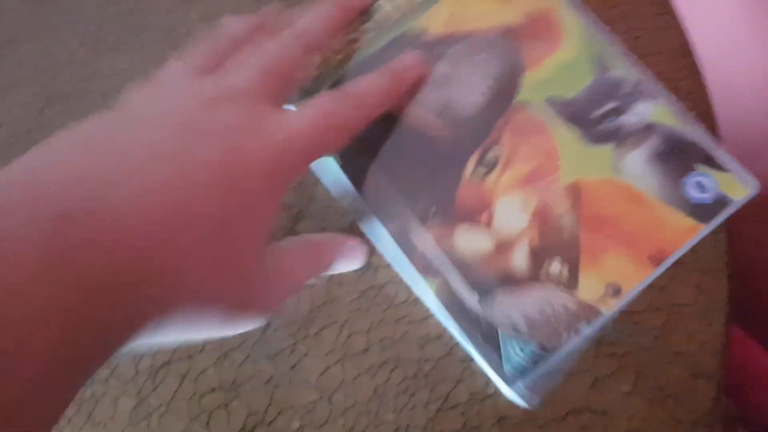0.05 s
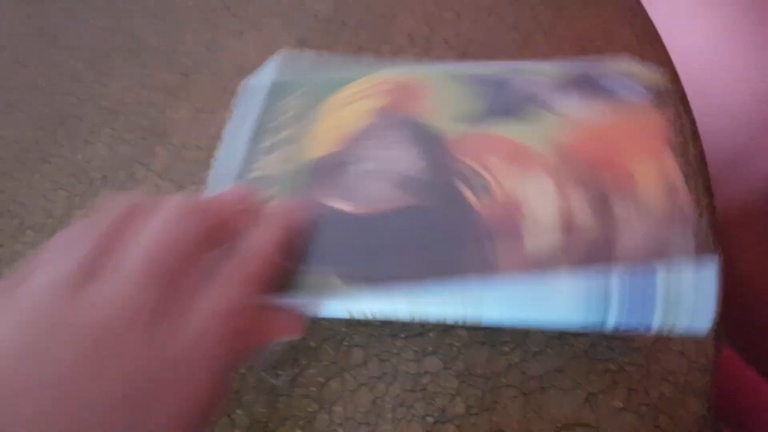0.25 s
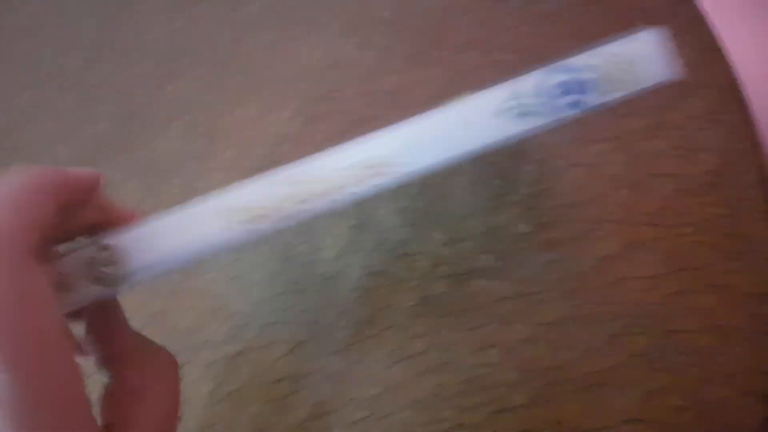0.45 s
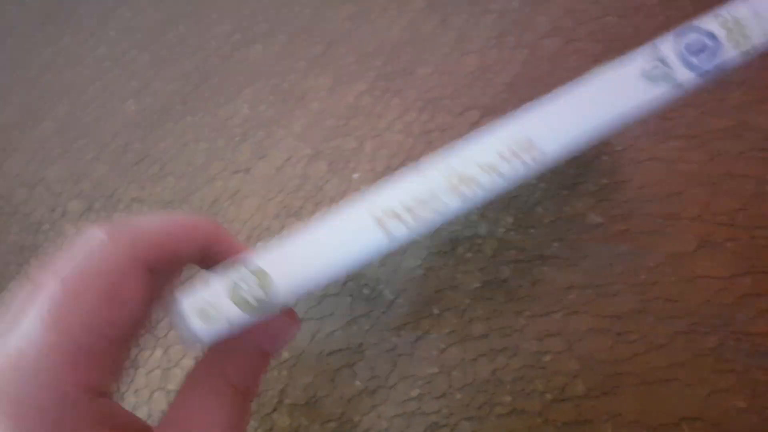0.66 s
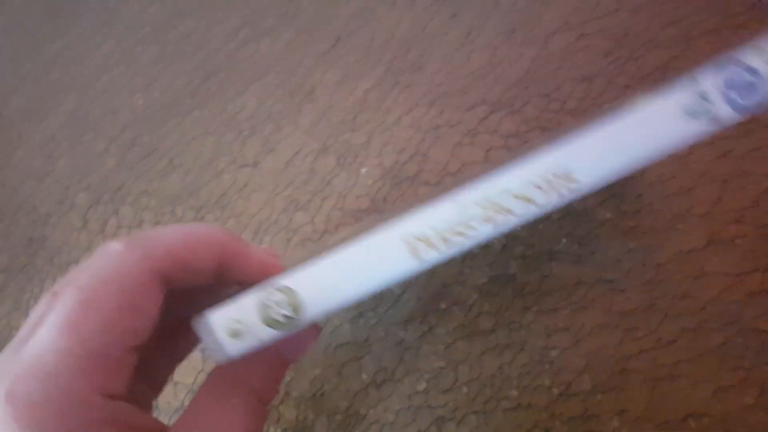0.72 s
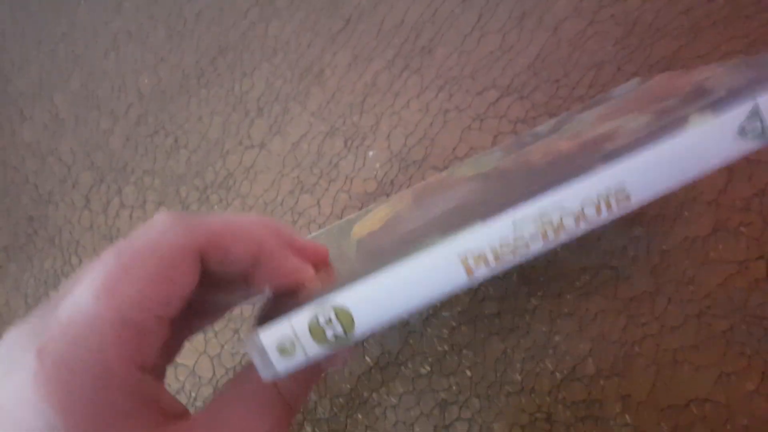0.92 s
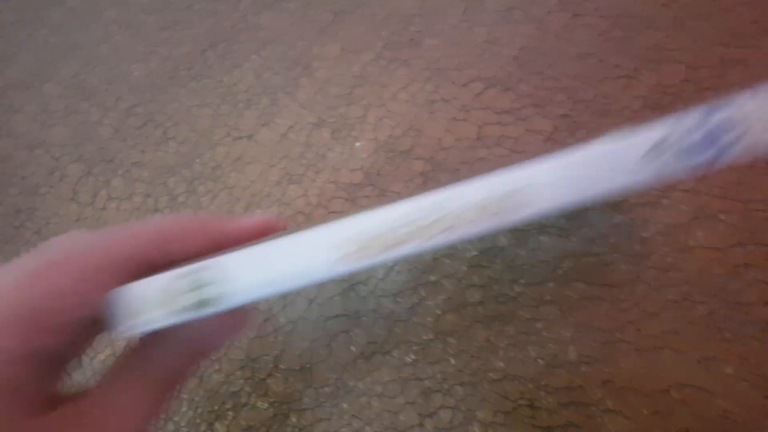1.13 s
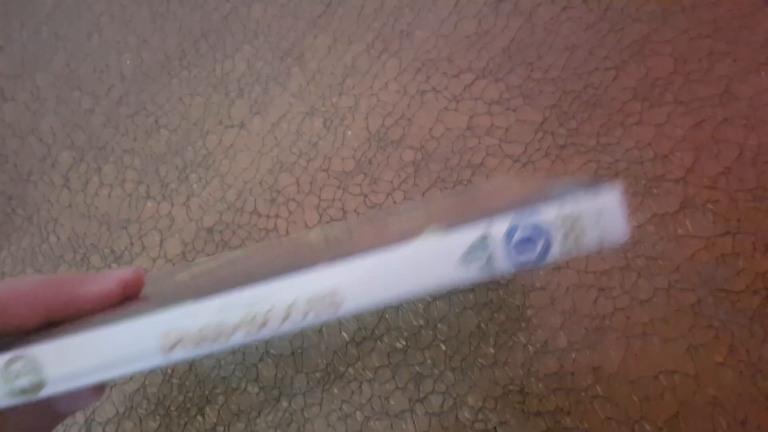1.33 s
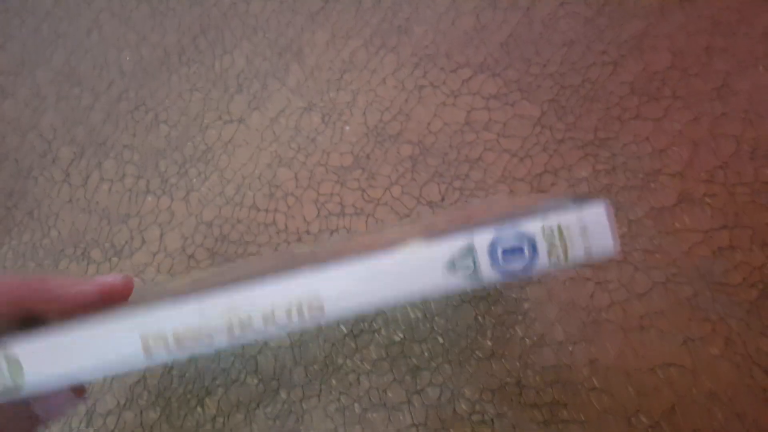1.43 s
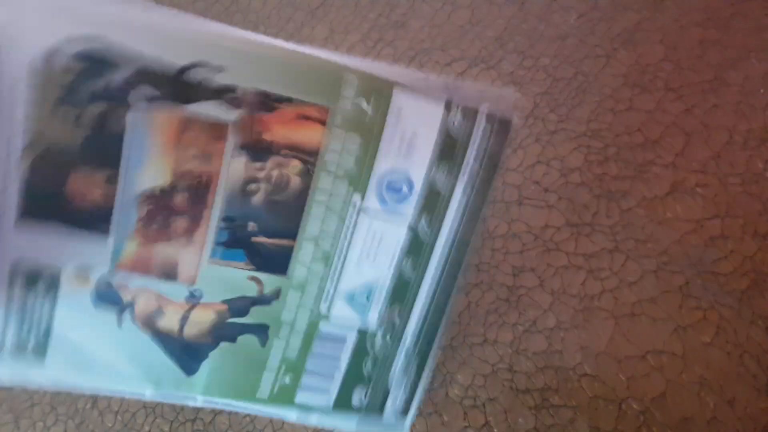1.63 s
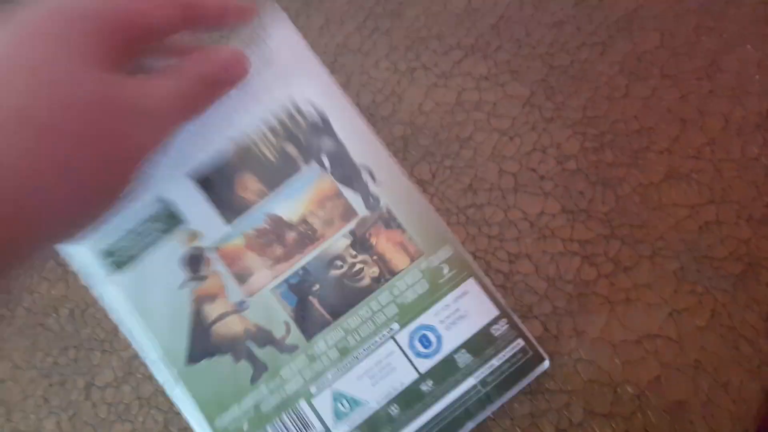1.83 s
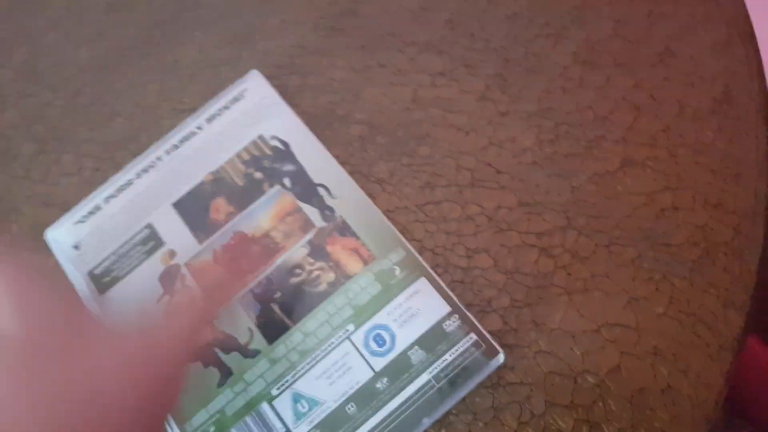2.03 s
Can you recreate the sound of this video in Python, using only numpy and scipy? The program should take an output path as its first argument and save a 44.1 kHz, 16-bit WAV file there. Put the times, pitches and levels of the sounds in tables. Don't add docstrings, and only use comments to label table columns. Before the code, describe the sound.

Close, slightly roomy stereo sound of a thin plastic case: soft touch and clicks, a loud cracking knock and lower thud, a quieter stretch of faint creaks, then a sharp click and hard landing.

```python
import sys
import numpy as np
from scipy import signal
from scipy.fft import rfft, irfft, next_fast_len
from scipy.io import wavfile
from scipy.ndimage import uniform_filter1d, map_coordinates

SR = 44100
rng = np.random.default_rng(int(sys.argv[2]) if len(sys.argv) > 2 else 0)


def put_to_file(sound):
    columns = np.atleast_2d(sound).T
    safe = np.clip(columns, -1, 1)
    whole_steps = np.round(safe * 32767)
    wavfile.write(sys.argv[1], SR, whole_steps.astype(np.int16))


def convert_level_to_amplitude(level_db):
    exponent = np.asarray(level_db, float) / 20
    return 10 ** exponent


N = 91331

# pitch_hz, bandwidth_hz, level_db
SHELL_MODES = [(565, 250, 0.5), (770, 81, -17), (900, 194, 2.5), (1125, 20, -2), (1420, 490, 1.5),
               (2070, 250, -17), (2500, 27, 1), (3380, 40, -4), (4370, 490, -11.5)]
# pitch_hz, bandwidth_hz, level_db
TABLE_MODES = [(146, 65, -8), (271, 38, 0.5), (314, 57, -3), (405, 84, -3.5)]


def unit(x):
    return x / np.sqrt(np.mean(x ** 2) + 1e-20)


def peak_unit(x):
    return x / np.abs(x).max()


def along(points, hz):
    f, v = np.transpose(points)
    return np.interp(np.log(hz + 1), np.log(f + 1), v)


def wobble(rate):
    knots = rng.standard_normal(int(N * rate / SR) + 4)
    return map_coordinates(knots, [np.arange(N) * rate / SR])


def filtered(x, response):
    n = x.shape[-1]
    m = next_fast_len(2 * n)
    return irfft(rfft(x, m) * response(np.fft.rfftfreq(m, 1 / SR)), m)[..., :n]


def coloured(x, points):
    return filtered(x, lambda hz: convert_level_to_amplitude(along(points, hz)) * (hz >= points[0][0]))


def modes(peaks, f):
    total = 0
    for k, (centre, width, db) in enumerate(peaks):
        resonance = 1j * f * width / (centre * centre - f * f + 1j * f * width)
        total = total + (-1) ** k * convert_level_to_amplitude(db) * resonance
    return total


def even(x, bins):
    z = rfft(x)
    return irfft(z / np.sqrt(uniform_filter1d(np.abs(z) ** 2, bins) + 1e-9), len(x))


def pair(x):
    # hz, coherence
    coherence = [(60, 0.8), (300, 0.91), (700, 0.76), (1400, 0), (3000, 0)]

    def mix(hz):
        angle = np.arccos(np.clip(along(coherence, hz), 0, 1)) / 2
        return np.array([np.cos(angle), np.sin(angle)])

    mid, side = filtered(x, mix)
    return np.array([mid + side, mid - side])


def background():
    # hz, level_db
    tone_spectrum = [(25, -7.5), (120, -10), (230, -5.5), (450, -17.5), (2000, -18.5), (5400, -35.5),
                     (9000, -42.5), (16000, -38)]
    # hz, level_db
    rumble_spectrum = [(20, -35), (45, 7.5), (80, 3.5), (130, -49.5)]
    # time_s, over_rumble_db
    bumps = [
        (.05, 28),
        (.25, 17.5),
        (.55, 6),
        (.87, -2),
        (1.37, 14),
        (1.79, 5),
        (1.88, 19),
    ]
    bump_s, swing_db = 0.075, 5.5
    tone = unit(coloured(pair(rng.standard_normal((2, N))), tone_spectrum))
    t = np.arange(N) / SR
    jolts = sum(db * np.exp(-((t - s) / bump_s) ** 2) for s, db in bumps)
    rumble = unit(coloured(pair(rng.standard_normal((2, N))), rumble_spectrum))
    rumble = rumble * convert_level_to_amplitude(swing_db * wobble(7.6) + jolts)
    return convert_level_to_amplitude(-56) * tone + convert_level_to_amplitude(-75) * rumble


def room(x):
    # hz, t60_s
    decay = [(150, 0.27), (400, 0.42), (1000, 0.32), (2800, 0.54), (7000, 0.28), (15000, 0.42)]
    # hz, level_db
    tail_spectrum = [(100, 2), (500, 5.5), (2000, 5.5), (6000, 4), (15000, -2)]
    delay_s = 0.004
    hz, t, z = signal.stft(rng.standard_normal((2, SR)), SR, nperseg=256)
    level_db = along(tail_spectrum, hz)[:, None] - 60 * t / along(decay, hz)[:, None]
    tail = pair(signal.istft(z * convert_level_to_amplitude(level_db), SR, nperseg=256)[1])
    late = np.pad(x, (round(delay_s * SR), 0))[None]
    return signal.fftconvolve(late, tail / np.linalg.norm(tail[0]), axes=1)[:, :N]


def slides():
    # start_s, length_s, level_db, centre_hz
    strokes = [
        (0.097, 0.11, -45.5, 13200),
        (0.11, 0.078, -52.5, 5300),
        (0.167, 0.1, -49.5, 11500),
        (0.246, 0.18, -50, 6900),
        (1.096, 0.1, -59.5, 5030),
        (1.167, 0.2, -56, 4900),
        (1.18, 0.15, -62, 12000),
        (1.513, 0.1, -64, 5600),
        (1.66, 0.027, -62, 11900),
        (1.707, 0.036, -59.5, 12500),
    ]
    t = np.arange(N) / SR
    out = np.zeros((2, N))
    for s, long, db, hz in strokes:
        band = [(hz, hz, 0)]
        hiss = unit(filtered(rng.standard_normal((2, N)), lambda f: modes(band, f) ** 2))
        stroke = np.sin(np.pi * np.clip((t - s) / long, 0, 1) ** 0.72)
        out += convert_level_to_amplitude(db) * stroke * hiss * convert_level_to_amplitude(2.4 * wobble(110))
    return out


def creak(gain, ring_db, lump_db):
    # pitch_hz, bandwidth_hz, level_db
    squeezed_modes = [(322, 14.8, 12.5), (900, 61, 1), (1613, 490, -1), (2500, 280, 11.5), (3080, 900, 5),
                      (4340, 320, 8.5), (5080, 1200, -3.5)]
    # hz, level_db
    creak_spectrum = [(150, 2), (350, -6), (900, 3.5), (1700, -5), (3000, -17), (5200, -11.5), (7000, -24),
                      (16000, -23)]
    slips_a_s, spread_db = 1700, 1.5
    size = np.minimum(spread_db * rng.exponential(size=N), 9)
    slips = (rng.random(N) < slips_a_s / SR) * rng.standard_normal((2, N)) * convert_level_to_amplitude(size)
    rub = pair(unit(slips) + 0.77 * rng.standard_normal((2, N)))
    rung = filtered(rub, lambda f: 1 + convert_level_to_amplitude(ring_db) * modes(squeezed_modes, f))
    return unit(coloured(rung, creak_spectrum)) * gain * convert_level_to_amplitude(lump_db * wobble(70))


def handling():
    # time_s, level_db
    grip_level = [(0, -35.5), (.1, -45.5), (.3, -46), (.4, -41.5), (.44, -41), (0.519, -45.5), (0.699, -42),
                  (1.054, -77), (1.1, -54), (1.28, -48.5), (1.3, -65.5), (1.44, -55.5), (1.56, -51),
                  (1.6, -66), (1.72, -57.5), (1.85, -40.5), (1.92, -43)]
    # start_s, length_s, level_db
    squeezes = [
        (1.079, 0.1, -51),
        (1.17, 0.11, -44.5),
    ]
    t = np.arange(N) / SR
    grip = creak(convert_level_to_amplitude(np.interp(t, *np.transpose(grip_level))), ring_db=3.5, lump_db=3.0)
    press = np.zeros(N)
    for s, long, db in squeezes:
        press += convert_level_to_amplitude(db) * np.abs(np.sin(np.pi * np.clip((t - s) / long, 0, 1))) ** 1.07
    return grip + creak(press, ring_db=12, lump_db=3.5)


def panels():
    # start_s, level_db, pitch_hz, t60_ms
    panel_modes = [(.032, -25, 657, 62), (.034, -32, 193.4, 126), (.14, -29.5, 1910, 20),
                   (0.142, -28.5, 2530, 7.8), (0.197, -30, 1376, 35), (0.197, -33, 4200, 34),
                   (.198, -32.5, 2610, 20), (.367, -35, 871, 47), (.476, -21, 1110, 28),
                   (.476, -20, 1400, 32), (.476, -25, 2300, 30), (0.474, -24, 504, 26),
                   (0.5311, -20, 341, 61), (.5322, -14, 917, 37), (.5324, -12, 1980, 22),
                   (.5324, -16, 2556, 20), (.5324, -18, 3350, 13), (.533, -24, 312.2, 250),
                   (.533, -27, 264, 180), (.533, -24, 1125, 370), (0.535, -22.5, 1488, 176),
                   (.533, -32.5, 614, 300), (.686, -20, 252, 57), (.686, -45, 180, 50),
                   (.687, -28, 259.4, 180), (.688, -30.5, 607, 47), (.6862, -21, 457, 35),
                   (0.689, -32, 1192, 150),
                   (1.066, -45, 292, 61), (1.092, -37.5, 287, 47), (1.078, -38.5, 870, 43),
                     (1.08, -43, 1654, 200), (1.118, -38, 1660, 44), (1.122, -62, 970, 84),
                     (1.199, -45, 350.6, 150), (1.22, -42, 1610, 100), (1.373, -40.5, 2110, 36),
                     (1.373, -39.5, 1560, 40), (1.373, -51, 2380, 64), (1.492, -34.5, 1045, 18),
                     (1.617, -47, 2016, 80), (1.663, -46.5, 2050, 84), (1.7735, -13.5, 1420, 18.3),
                     (1.7735, -15.5, 2060, 25), (1.773, -16, 3320, 11.6), (1.7745, -20.5, 3980, 14),
                     (1.789, -18.5, 900, 16.3), (1.789, -29, 2070, 22), (1.789, -31, 5230, 13),
                     (1.869, -21, 2080, 17), (1.87, -29, 194, 35), (1.8905, -20, 3320, 12),
                     (1.9163, -11, 992, 38), (1.9163, -7, 1366, 13), (1.919, -18, 1860, 29),
                     (1.924, -27, 646, 320), (1.917, -21, 327, 56), (1.92, -26, 270, 310),
                     (1.925, -31, 459.4, 245)]
    flutter_db, flutter_rad, flutter_rate = 4, 1.2, 75
    rise = 0.013
    rows = panel_modes
    out, t = np.zeros(N + SR), np.arange(SR // 3) / SR
    for (s, db, hz, ms), knots in zip(rows, rng.standard_normal((len(rows), 2, 30))):
        beat = t * flutter_rate
        size, turn = [map_coordinates(k, [beat]) * np.minimum(beat, 1) for k in knots]
        life = t * 1000 / ms
        swell = convert_level_to_amplitude(db - 60 * life + flutter_db * size) * (1 - np.exp(-life / rise))
        out[round(s * SR):][:len(t)] -= swell * np.sin(2 * np.pi * hz * t + flutter_rad * turn)
    return out[:N]


def rings():
    # time_s, level_db, centre_hz, boom_db
    blows = [
        (0.038, -18, 650, -25),
        (.533, 3, 1020, 2),
        (0.686, -16, 400, 7),
        (1.917, 8.5, 1300, 2),
    ]
    out = np.zeros((2, N))
    for s, db, hz, boom_db in blows:
        blow = np.zeros(N)
        blow[round(s * SR)] = 1

        def tone(f):
            shell = 1 + convert_level_to_amplitude(-10) * modes(SHELL_MODES, f)
            return modes([(hz, 1.23 * hz, 0)], f) * shell + convert_level_to_amplitude(boom_db) * modes(TABLE_MODES, f)

        blow = filtered(blow, tone)
        out += convert_level_to_amplitude(db) * room(blow / np.linalg.norm(blow))
    return out


def contact(hz, ms, crack_db, boom_db, sharp_db, chance):
    # hz, level_db
    crack_spectrum = [(2000, 6), (5000, 4.5), (9000, -3), (13000, -7)]
    t = np.arange(chance.shape[1]) / SR
    life = t / (ms / 1000)
    burst = even(chance[0] * life * np.exp(-4 * life), bins=21)
    burst[8] -= convert_level_to_amplitude(sharp_db) * np.abs(burst).max()

    def near(f, wide):
        return modes([(hz, wide * hz, 0)], f)

    def shell(f):
        pitched = near(f, 0.2) * near(f, 3.5) ** 2
        return pitched + convert_level_to_amplitude(-6) * near(f, 2.55) * modes(SHELL_MODES, f)

    longest_crack_ms = 8.9
    edge = np.minimum(t * 3000, 1) * np.exp(-t * 1000 / min(ms, longest_crack_ms) * 3)
    crack = peak_unit(coloured(chance[1], crack_spectrum) * edge)
    boom = peak_unit(filtered(burst, lambda f: modes(TABLE_MODES, f)))
    body = peak_unit(filtered(burst, shell)) + convert_level_to_amplitude(boom_db) * boom
    return peak_unit(body) + convert_level_to_amplitude(crack_db) * crack


def play(rows, boom_db, sharp_db):
    out, chance = np.zeros(N + 4096), rng.standard_normal((len(rows), 2, 4096))
    for (s, db, hz, ms, crack_db), c in zip(rows, chance):
        out[round(s * SR):][:c.shape[1]] += convert_level_to_amplitude(db) * contact(hz, ms, crack_db, boom_db, sharp_db, c)
    return out[:N]


def clicks():
    # start_s, peak_db, pitch_hz, length_ms, crack_db
    lift_clicks = [(.14, -24, 2150, 2.1, -26), (.198, -24.5, 1420, 7.9, -19), (.212, -25.5, 1350, 6.4, -27),
                   (.228, -36, 925, 2.8, -23), (.235, -26.5, 1140, 11.6, -26),
                   (.241, -33.5, 1340, 5.9, -26), (.299, -60, 1550, 9.3, -25), (.327, -34, 1770, 6.7, -23),
                   (.367, -29, 800, 7, -6), (.428, -31, 2230, 5.2, -23), (.475, -20.5, 1240, 11, -15),
                   (.497, -25, 1500, 4.4, -37), (.552, -32, 2500, 3.8, -22), (.744, -33.5, 2500, 8, -41)]
    # start_s, peak_db, pitch_hz, length_ms, crack_db
    turn_clicks = [(1.079, -40.5, 864, 11, -30), (1.096, -35.5, 900, 10.6, -28),
                   (1.373, -37, 1950, 16.7, -17), (1.424, -47, 3830, 24, -14),
                   (1.491, -41.5, 1030, 10, 1.5), (1.514, -40.5, 1180, 9.2, -22),
                   (1.561, -48.5, 590, 24, -11), (1.586, -39, 560, 8.6, 2), (1.618, -45, 3700, 9.2, -23),
                   (1.662, -40, 2000, 20, -2), (1.738, -41, 980, 9.7, -18), (1.758, -32.5, 1350, 8.3, -35),
                   (1.773, -12.5, 1980, 6.1, -10), (1.789, -23, 1390, 13, -3),
                   (1.81, -26.5, 1160, 5.9, -35), (1.824, -33, 1620, 4.8, -12),
                   (1.869, -21, 1500, 9.6, -12), (1.8911, -15, 1500, 5.9, -17),
                   (1.901, -25, 1340, 2.9, -25), (1.948, -17.5, 3700, 5, -41), (1.968, -23, 1520, 1.9, -20)]
    return [play(rows, boom_db=-24, sharp_db=-24) for rows in (lift_clicks, turn_clicks)]


def knocks():
    # start_s, peak_db, contact_hz, length_ms, crack_db
    edge_knocks = [
        (0.031, -19.5, 602, 3.5, -39),
        (.038, -21.5, 657, 10.5, -36),
        (0.5313, -6.5, 1364, 5.2, -0.5),
        (0.6856, -12, 271.4, 5.9, -12.5),
        (1.916, -12, 1260, 5.7, -28),
        (1.921, -11.5, 1600, 6.1, -4),
        (1.931, -12.5, 970, 3, -9),
    ]
    return play(edge_knocks, boom_db=-14, sharp_db=10)


def scene():
    # hz, left_over_right_db
    port_lean = [(60, -2), (110, -3.5), (200, -2), (380, 0.5), (700, -0.5), (1290, -3), (2380, -6),
                 (4400, -5.5), (8120, 1.5), (15000, 1)]
    lead_rad, lead_hz = 1.13, 1500
    still = background()
    stroke, rub, sing = slides(), handling(), panels()
    click_parts, knock = clicks(), knocks()
    wet = rings() + convert_level_to_amplitude(-7) * room(knock) + convert_level_to_amplitude(-8.5) * room(rub.mean(0)) + convert_level_to_amplitude(-9) * room(sing)
    wet = wet + sum(convert_level_to_amplitude(-13) * room(part) for part in click_parts)
    case = knock + sum(click_parts) + sing + rub + stroke + wet
    side = np.array([[.5], [-.5]])

    def ports(hz):
        return convert_level_to_amplitude(side * along(port_lean, hz)) * np.exp(1j * side * lead_rad * np.tanh(hz / lead_hz))

    return filtered(case, ports)[:, :N] + still


def low_pass(x):
    return signal.sosfilt(signal.butter(12, 16820, fs=SR, output="sos"), x)


def record(dry):
    # hz, level_db
    band_edge = [(10, 0), (15700, 0), (16000, -26), (16800, -34), (16900, -90)]
    return low_pass(coloured(dry, band_edge))


dry = scene()
out = record(dry)
put_to_file(out)
```